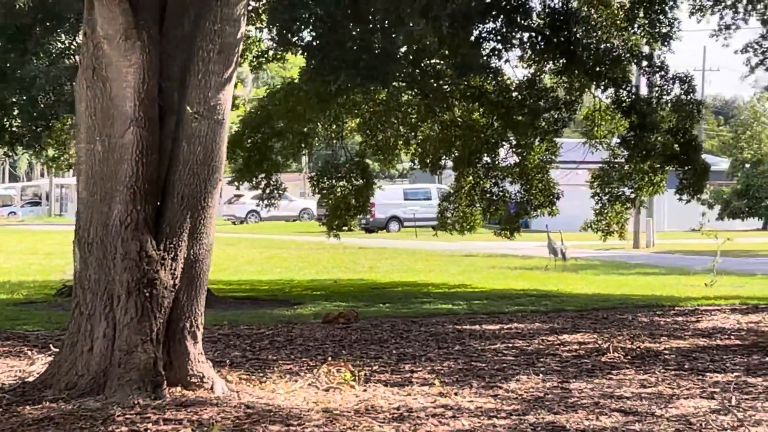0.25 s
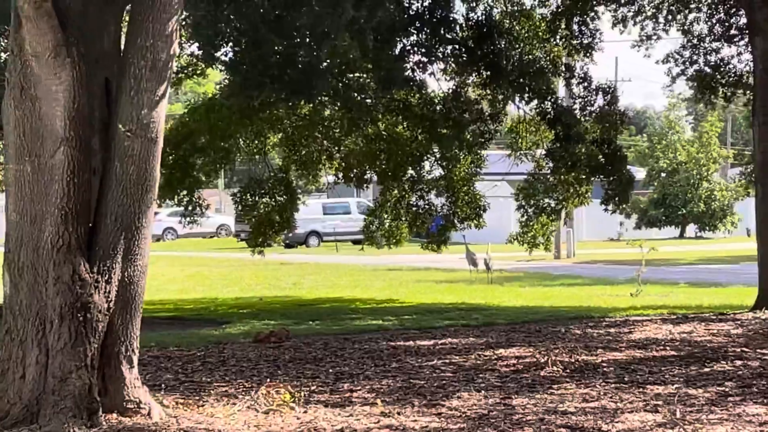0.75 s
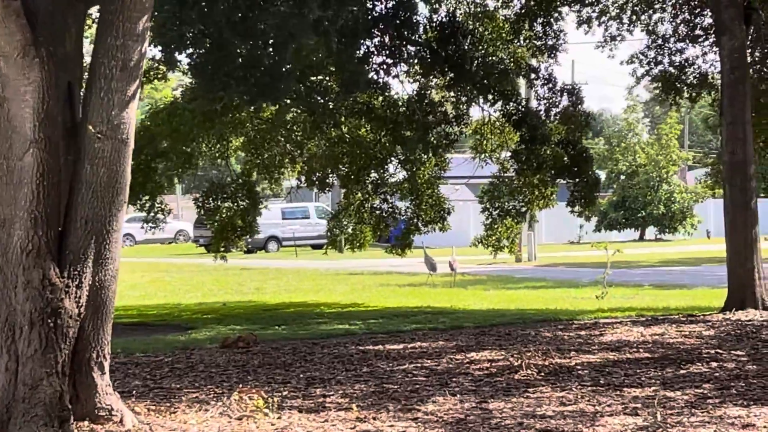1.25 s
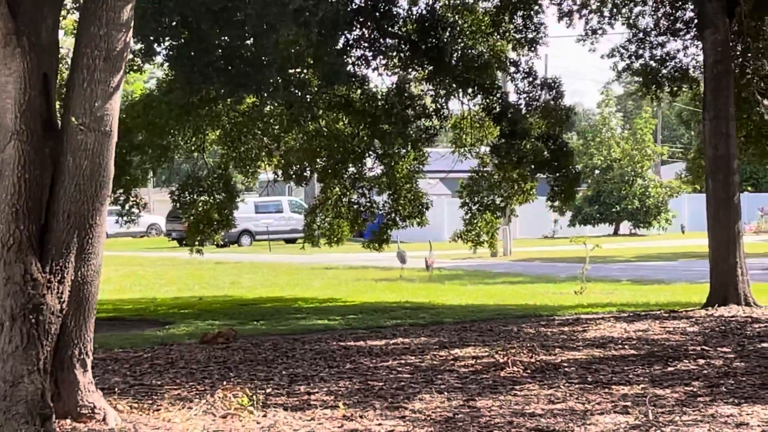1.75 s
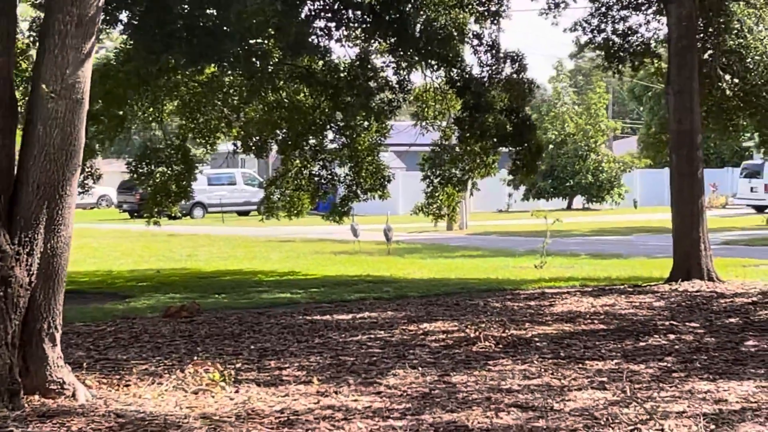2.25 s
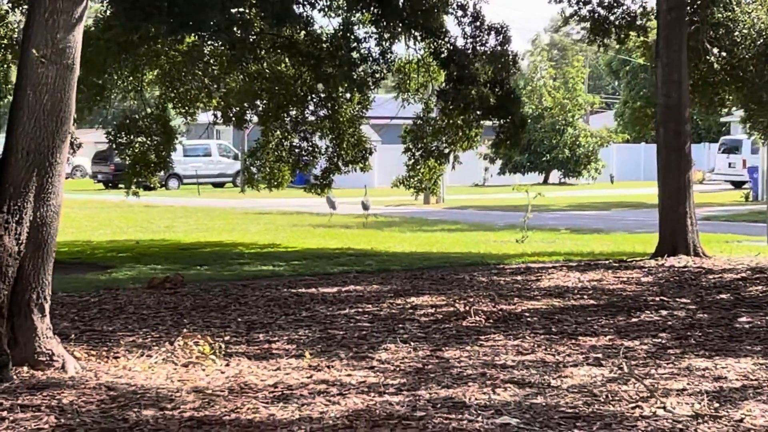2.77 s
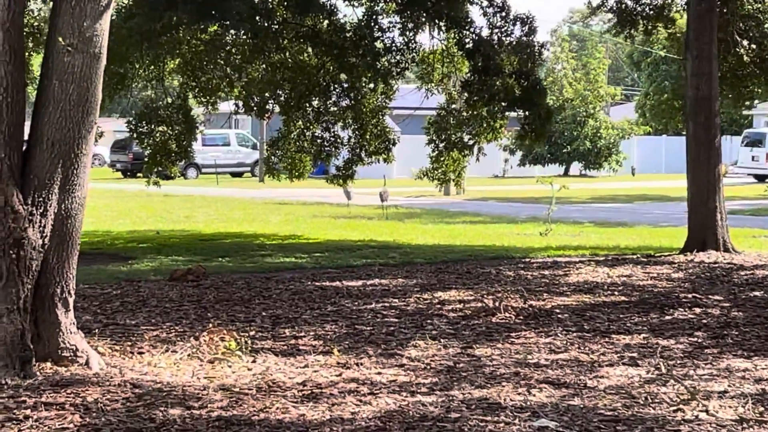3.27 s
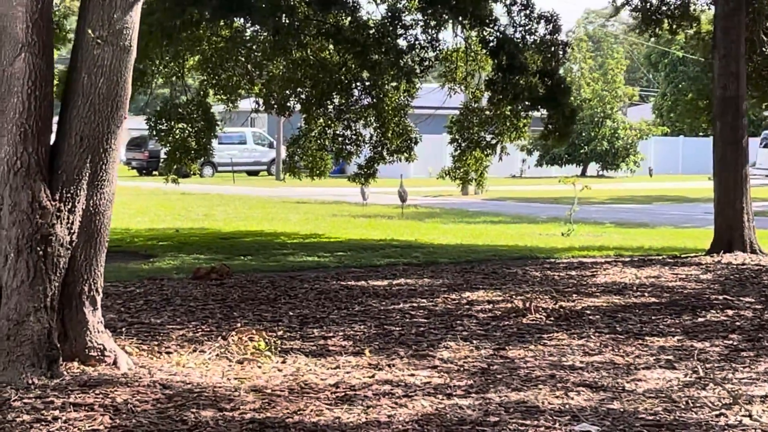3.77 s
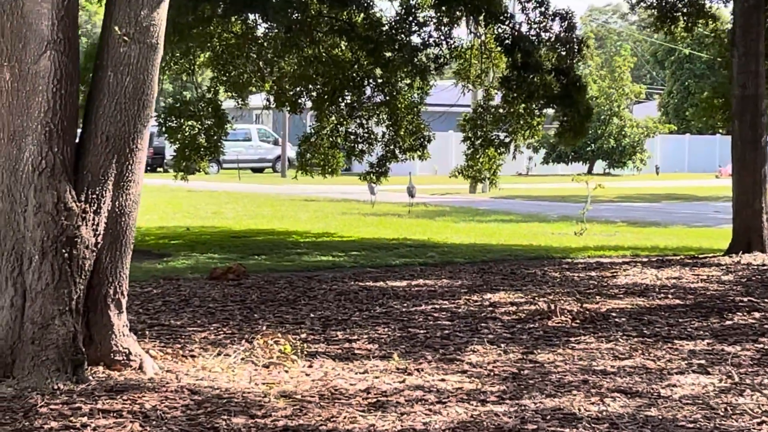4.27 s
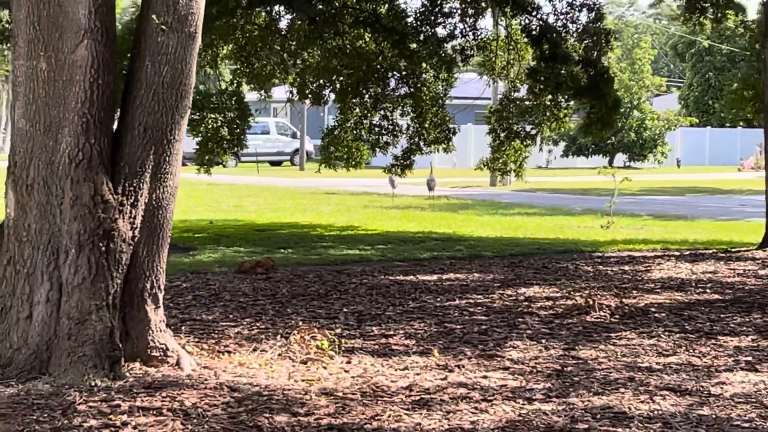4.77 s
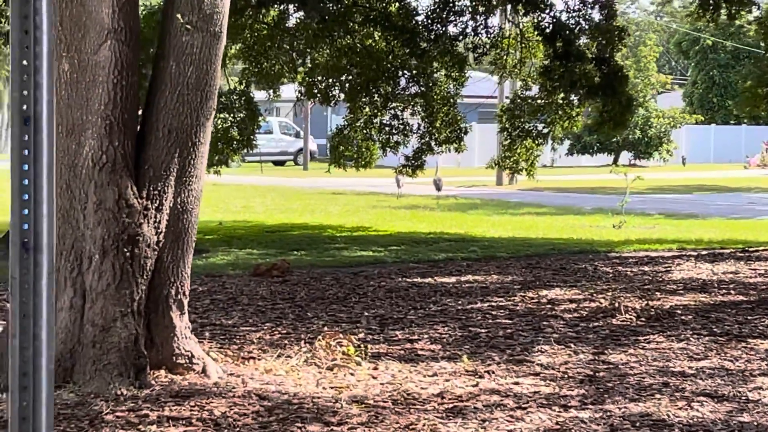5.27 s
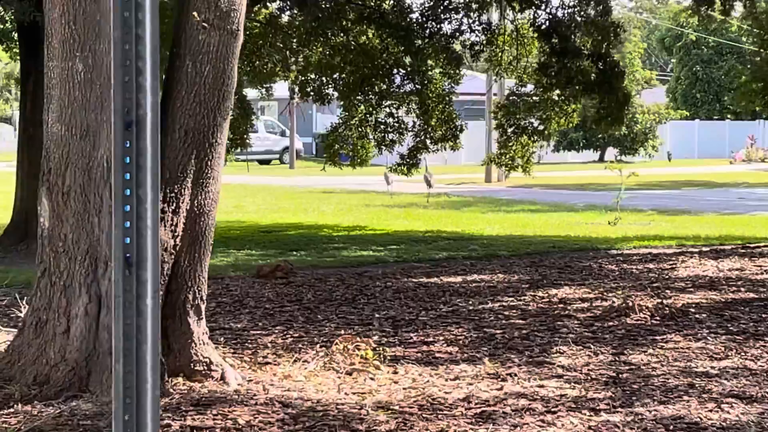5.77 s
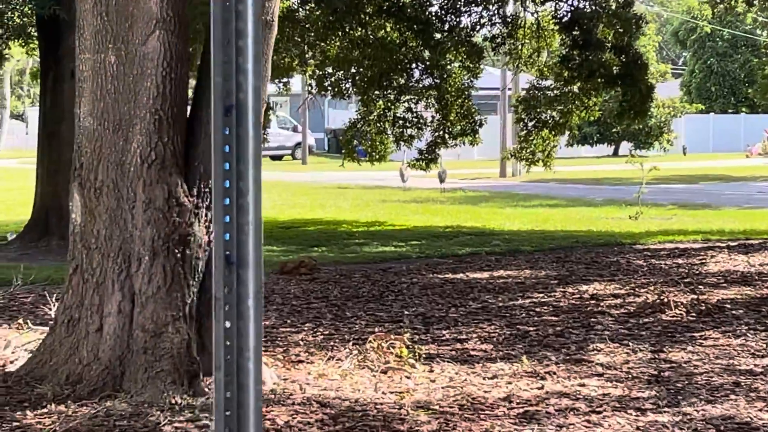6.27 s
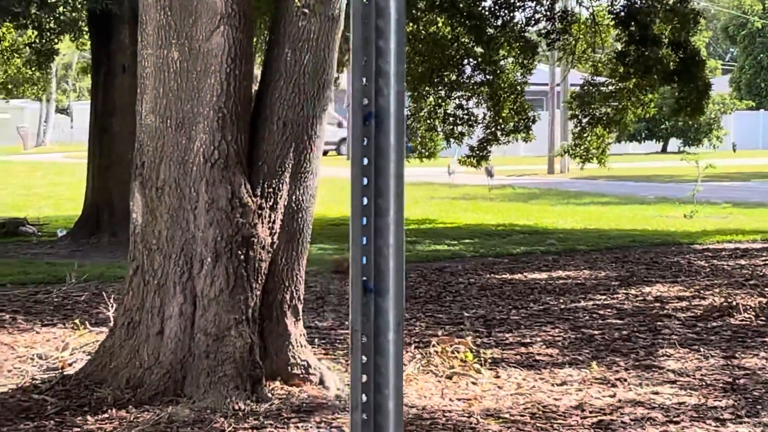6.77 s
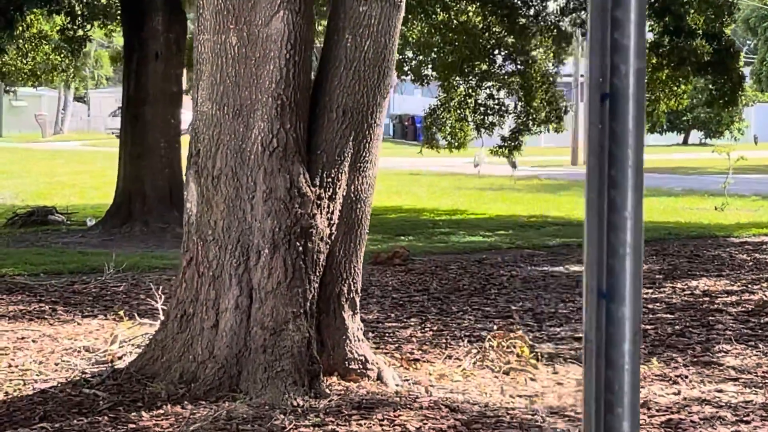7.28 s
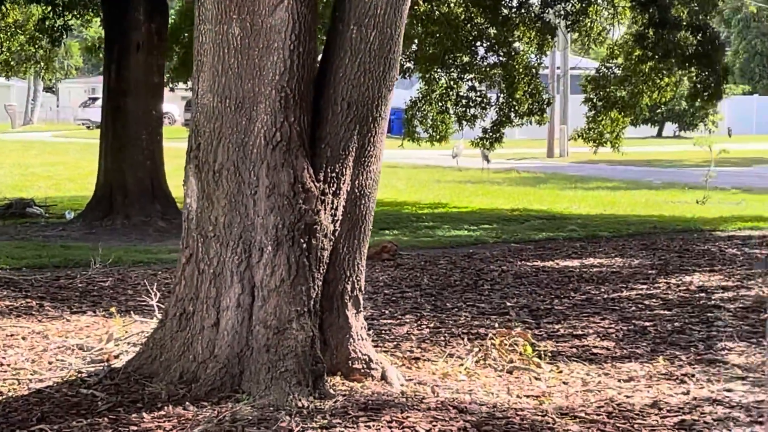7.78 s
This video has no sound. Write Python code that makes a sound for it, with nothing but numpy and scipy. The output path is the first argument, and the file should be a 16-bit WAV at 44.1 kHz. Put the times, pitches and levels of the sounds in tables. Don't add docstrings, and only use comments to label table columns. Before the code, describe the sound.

Two distant cranes give three overlapping bursts of rattling, tooting calls across a yard, echoing over low traffic rumble and faint rustling leaves.

```python
import sys
import numpy as np
from scipy import signal
from scipy.fft import rfft, irfft, next_fast_len
from scipy.io import wavfile

SR = 44100
rng = np.random.default_rng(int(sys.argv[2]) if len(sys.argv) > 2 else 0)


def output_pcm(signal):
    pcm = np.clip(np.atleast_2d(signal).T, -1, 1) * 32767
    wavfile.write(sys.argv[1], SR, np.round(pcm).astype(np.int16))


def amplitude_ratio(level_db):
    exponent = np.asarray(level_db, float) / 20
    return 10 ** exponent


N = 354034


def at_hz(points, hz):
    return np.interp(np.log(hz), np.log(np.array(points)[:, 0]), np.array(points)[:, 1])


def rms_one(x):
    return x / np.sqrt(np.mean(x ** 2) + 1e-20)


def drift(rate_hz):
    r = np.exp(-80 * np.pi * rate_hz / SR)
    slow = signal.lfilter([1], [1, -2 * r, r * r], rng.standard_normal(N // 40 + 2002))[2000:]
    return np.interp(np.arange(N) / 40, np.arange(len(slow)), rms_one(slow))


def resonate(x, hz, width_hz):
    r = np.exp(-np.pi * width_hz / SR)
    feedback = [1, -2 * r * np.cos(2 * np.pi * hz / SR), r * r]
    return signal.lfilter((1 - r * r) / 2 * np.array([1, 0, -1]), feedback, x + 1e-18)


def keep_band(x, order, edge_hz, kind):
    return signal.sosfilt(signal.butter(order, edge_hz, kind, fs=SR, output="sos"), x)


def coloured(spectrum_db, hz):
    return irfft(rfft(rng.standard_normal(2 * len(hz) - 2)) * amplitude_ratio(spectrum_db))[:N]


# f/Hz, level/dB per Hz
AIR_COLOUR = [(15, -45), (24, -30), (37, -0.5), (59, -2.5), (143, -5), (162, -11.5), (374, -21),
              (520, -21.5), (907, -26.5), (1940, -36), (4800, -46.5), (8000, -57), (10000, -46.5),
              (13000, -70)]
# f/Hz, side minus middle level/dB
AIR_WIDTH = [(30, -27), (110, -18.5), (200, -9.5), (400, -3.5), (800, 0), (1300, -2.5), (2100, -10),
             (3500, -53), (12000, -43)]
# f/Hz, width/Hz, rms level/dB
MOTOR_HUM = [
    (58.3, 21, -54),
    (137.92, 5.1, -54.5),
    (208.4, 5.1, -64),
    (298, 3.4, -72),
]


def air():
    hz = np.fft.rfftfreq(next_fast_len(N // 2 + 1) * 2, 1 / SR) + 1
    mid = coloured(at_hz(AIR_COLOUR, hz), hz)
    side = coloured(at_hz(AIR_COLOUR, hz) + at_hz(AIR_WIDTH, hz), hz)
    level = amplitude_ratio(-45 + 0.15 * drift(2.8))
    both = level * (mid + side * [[1], [-1]]) / mid.std()
    white = rng.standard_normal(N)
    for f, width_hz, db in MOTOR_HUM:
        hum = resonate(resonate(white, f, width_hz), f, width_hz)
        both = both + amplitude_ratio(db) * rms_one(hum)
    return both


# middle t/s, half length/s, level/dB
BUZZ_SWELLS = [
    (1.58, .15, -75),
    (2.788, .14, -70),
    (4.5, .15, -77),
    (6.7, 0.13, -83),
    (7.16, .09, -74),
    (7.6, .25, -83),
]


def insects():
    t = np.arange(N) / SR
    buzz = resonate(resonate(rng.standard_normal(N), 4750, 260), 4750, 260)
    swell = amplitude_ratio(-86)
    for middle_s, half_s, db in BUZZ_SWELLS:
        swell = swell + amplitude_ratio(db) * np.exp(-((t - middle_s) / half_s) ** 2)
    return swell * amplitude_ratio(-6.0 + 1.5 * drift(7.4)) * rms_one(buzz)


# start t/s, length/s, level/dB, top octave level/dB
STIRS = [(0.002, 0.0091, -73, -4), (0.303, 0.097, -76, -4), (1.274, .06, -70, 5), (1.829, 0.058, -67.5, 12),
         (1.89, 0.18, -75, 12), (2.33, 0.02, -80, -1), (2.78, 0.17, -77, 0), (3.076, 0.035, -74, 0.5),
         (3.183, .025, -85, 7), (4.455, 0.018, -82, 8), (4.677, 0.12, -75, 0), (5.373, 0.073, -77.5, 9),
         (5.434, 0.037, -69, 12), (5.734, 0.015, -82, 10), (6.967, 0.23, -78, 7), (7.194, .08, -84, 3),
         (7.4, .025, -88, 1.5), (7.596, .025, -80, 3), (7.88, .05, -76, -11)]


def stirring(calls):
    attack_s, release_s, scatter_s = 0.0075, 0.039, 0.092
    leaves_db, leaves_top_db = -76, -12
    t = np.arange(N) / SR
    keep = np.exp(-1 / (scatter_s * SR))
    scatter = amplitude_ratio(-24.5) * np.sqrt(signal.lfilter([1 - keep], [1, -keep], calls ** 2 + 1e-18))
    body = amplitude_ratio(leaves_db) + scatter
    top = amplitude_ratio(leaves_db + leaves_top_db) + amplitude_ratio(-48) * scatter
    for s, length_s, db, top_db in STIRS:
        rise = np.clip((t - s) / attack_s + 1, 0, 1)
        shape = rise * np.exp(-np.maximum(t - s - length_s, 0) / release_s)
        body = body + amplitude_ratio(db) * shape
        top = top + amplitude_ratio(db + top_db) * shape
    return body, top


# t/s, peak level/dB, level of the part under 3.8 kHz/dB
TICK_EVENTS = [(0.4349, -53, 1), (0.4995, -46, 2), (1.918, -47, -7), (1.9706, -45, -1), (1.9952, -49, 8.5),
               (2.0234, -52, 9), (2.0732, -44, -1), (2.35, -50, -1), (3.0837, -55, 6), (3.4999, -58, -1),
               (4.4637, -48, -1), (4.6074, -66, 5), (4.6704, -49, 3), (4.758, -42, -3), (5.37, -41, -17),
               (5.4314, -47, 6), (5.456, -40, 6), (5.6394, -50.5, -4), (5.6864, -49, 5.5),
               (7.109, -27.5, -2.5), (7.1105, -30, -2.5), (7.2026, -38.5, -16), (7.2694, -49, -7),
               (7.6194, -55, -3), (7.8853, -52, 4)]


def ticks():
    out, t = np.zeros(N), np.arange(900) / SR
    for s, db, knock_db in TICK_EVENTS:
        crackle = rng.standard_normal(900) * (0.65 * np.exp(-t / 0.00055) + 0.12 * np.exp(-t / 0.0095))
        snap = 3.5 * (t == 0) + crackle
        bright = keep_band(snap, 1, [4000, 9000], "band")
        knock = amplitude_ratio(knock_db + 9.0) * keep_band(snap, 1, [500, 3800], "band")
        out[round(s * SR):][:900] += amplitude_ratio(db - 4) * (bright + knock)
    return out


# f/Hz, level/dB per Hz
GRAIN_COLOUR = [(900, -56), (2500, 1), (5000, 3), (8000, -2.5), (11500, -5), (15000, -8)]


def rustle(calls, grains_per_s, grain_db):
    hz = np.fft.rfftfreq(512, 1 / SR) + 1
    colour = signal.minimum_phase(np.roll(irfft(amplitude_ratio(2 * at_hz(GRAIN_COLOUR, hz))), 256)[1:])
    sizes = amplitude_ratio(grain_db * np.minimum(rng.exponential(1, N), 4)) * rng.choice([-1, 1], N)
    struck = rng.random(N) < grains_per_s / SR
    grains = rms_one(signal.lfilter(colour, 1, sizes * struck))
    body_gain, top_gain = stirring(calls)
    body = keep_band(grains, 4, 10300, "low")
    top = keep_band(grains, 4, 10300, "high")
    restless_top = top_gain * amplitude_ratio(8.0 + 3.4 * drift(9.2)) * top
    mid = amplitude_ratio(0.5 + 1.57 * drift(32)) * (body_gain * body + restless_top)
    apart = np.roll(grains, N // 2) - np.roll(body, N // 2) * (1 - amplitude_ratio(-6))
    side = amplitude_ratio(-16.5) * amplitude_ratio(3.8 * drift(9)) * top_gain * apart
    return mid + ticks() + side * [[1], [-1]]


# delay t/s, left level/dB, right level/dB
YARD_ECHOES = [
    (.0052, -12, -33),
    (.0175, -10.5, -13),
    (.038, -19, -28),
    (.0715, -31, -11.5),
    (.104, -56, -22),
]
# f/Hz, time to fall 60 dB/s, level/dB
TAIL_BANDS = [(850, 0.94, 0), (1720, 0.99, -6), (4550, 1, 2), (8750, 0.9, 10.5)]


def yard(x, tail_db, wide_db):
    dull = signal.lfilter([.45], [1, -.55], x)
    out = np.array([x, x])
    for delay_s, *sides_db in YARD_ECHOES:
        lag = round(delay_s * SR)
        out[:, lag:] += amplitude_ratio(np.array(sides_db))[:, None] * dull[:-lag]
    t, tail = np.arange(SR) / SR, 0
    for hz, t60, db in TAIL_BANDS:
        hiss = keep_band(rng.standard_normal((2, SR)), 2, [hz / 1.49, hz * 1.26], "band")
        tail = tail + hiss * amplitude_ratio(db - 60 * t / t60) * (1 - np.exp(-t / 0.056))
    stirred = np.tanh(4 * drift(150))
    mid, side = signal.fftconvolve(x[None] * stirred, amplitude_ratio(tail_db) * tail, axes=1)[:, :N]
    side = keep_band(side, 3, 2500, "low")
    return out + mid + amplitude_ratio(wide_db) * side * [[1], [-1]]


# start t/s, length/s, top of third overtone f/Hz, peak level/dB,
# lower overtones level/dB
TOOT_EVENTS = [
    (0.475, 0.048, 1690, -53.5, 2),
    (0.666, 0.075, 1742, -42, -0.5),
    (3.47, .017, 1800, -63, 8),
    (3.628, 0.062, 1716, -42, 1),
    (5.71, 0.039, 1782, -55, 8),
    (5.885, 0.07, 1743, -41, -2.5),
]
OVERTONES = [-12, 0.5, 1.5, -13.5, -7.5, -8.5, -20, -20, -29]


def toots():
    glide, glide_share = .13, .28
    swell_db, swell_share = 12.5, 0.43
    release_s, release_db = 0.006, 14
    low_at_edges_db, waver_db = 11, 2.5
    out, flutter = np.zeros(N), drift(80)
    for s, length_s, top_hz, peak_db, lower_db in TOOT_EVENTS:
        span = np.arange(round(s * SR), round((s + length_s) * SR))
        gone = (span / SR - s) / length_s
        left_s = (span[-1] - span) / SR
        third_hz = top_hz * (1 - glide * np.exp(-gone / glide_share))
        early = np.clip(1 - gone / swell_share, 0, 1)
        closing = np.clip(1 - left_s / release_s, 0, 1)
        db = peak_db - swell_db * early - release_db * closing
        low_db = lower_db + low_at_edges_db * np.maximum(early, closing)
        phase = 2 * np.pi * np.cumsum(third_hz * (1 + flutter[span] / 150) / 3) / SR
        edge = np.clip(np.minimum(span - span[0], span[-1] - span) / (.005 * SR), 0, 1)
        for k, overtone_db in enumerate(OVERTONES, 1):
            effort_db = .5 * (db + 41.5) * (k > 3)
            waver = waver_db * flutter[span - 3000 * k]
            gain = amplitude_ratio(db + low_db * (k < 3) + effort_db + overtone_db + 3.5 + waver)
            out[span] += edge * gain * np.sin(k * phase + k * k)
    return out


def rattle(beats, pipe, rough, bright_db, kept, rise_ms, low_decay_db, upper_decay_db, fall, breath_db):
    upper, lowest, flow = np.zeros(N + 1), np.zeros(N + 1), np.zeros(N)
    cycle = np.arange(40)
    for s, db, hz, length_ms in beats:
        timing, size = rng.standard_normal((2, 40))
        upper_db = bright_db - kept * (db + 30)
        late = np.clip(cycle / hz * 1000 / length_ms, 0, 1)
        uneven = rough * (.2 + late ** 2)
        dropped = np.clip((late - .55) / .2, 0, 1)
        period_ms = 990 / hz * (1 + .03 * late + fall * dropped) * np.exp(.16 * uneven * timing)
        t_ms = np.cumsum(period_ms) - period_ms[0] - 1.6
        burst_db = 3.5 * np.exp(-((t_ms - 3.37) / 2.1) ** 2)
        rise = np.clip((t_ms + 1.66) / rise_ms, 0, 1)
        stop = np.clip((length_ms - t_ms) / 0.39, 0, 1)
        shape = amplitude_ratio(db + burst_db) * rise * stop
        strength = shape * amplitude_ratio(5 * uneven * size) * (1 - .7 * uneven * (cycle % 2))
        place = (s + t_ms / 1000) * SR
        whole, part = place.astype(int), place % 1
        snap_db = 4 * np.exp(-cycle / 2.0)
        upper_gain = amplitude_ratio(upper_db + upper_decay_db * late + snap_db)
        for train, gain in ((upper, upper_gain), (lowest, amplitude_ratio(low_decay_db * late))):
            np.add.at(train, whole, gain * strength * (1 - part))
            np.add.at(train, whole + 1, gain * strength * part)
        span = np.arange(whole[0], whole[-1])
        flow[span] += np.interp(span, place, shape * amplitude_ratio(upper_db + upper_decay_db * late))
    breath = amplitude_ratio(breath_db) * flow * rng.standard_normal(N)
    out = np.zeros(N)
    for k, (hz, width_hz, db) in enumerate(pipe):
        driven = lowest[:N] if k == 0 else upper[:N] + breath * hz / 4000
        out += (-1) ** k * amplitude_ratio(db) * resonate(driven, hz, width_hz)
    return keep_band(out, 4, 600, "high")


# t/s, peak level/dB, f/Hz, length/ms
LOW_BIRD_BEATS = [(0.796, -26, 767, 22), (0.87, -28.5, 771, 22.3), (0.933, -27, 769, 22.5),
                  (0.99, -27.5, 767, 22.3), (1.047, -28, 752, 21), (3.757, -27, 763, 22.4),
                  (3.831, -32, 757, 22), (3.89, -27, 766, 22.3), (3.947, -28, 777, 21.4),
                  (4.002, -29.5, 745, 21.7), (6.015, -37, 783, 22), (6.087, -41, 756, 22),
                  (6.15, -33, 733, 22.9), (6.209, -37, 759, 22), (6.264, -38.5, 754, 22)]
# f/Hz, width/Hz, level/dB
LOW_BIRD_PIPE = [(813, 138, 6.5), (1230, 310, 2.5), (1584, 246, 3.5), (1904, 200, 1.5), (2250, 370, -11),
                 (2840, 380, -6), (3650, 1800, -19), (5560, 2000, -31), (11100, 1400, -41)]
# t/s, peak level/dB, f/Hz, length/ms
CROAK_BEATS = [(1.101, -27.5, 602, 14), (1.155, -28.5, 611.5, 18), (1.204, -31, 607, 13),
               (1.3, -53, 640, 25), (4.058, -27.5, 599, 18), (4.114, -27.5, 602, 13.4),
               (4.163, -30.5, 597, 11.2), (4.217, -71, 580, 6.5), (6.32, -28, 596, 16),
               (6.373, -28.5, 601, 15.2), (6.428, -30.5, 595, 12.4), (6.48, -43.5, 607, 14)]
# f/Hz, width/Hz, level/dB
CROAKING_PIPE = [(777, 84, 8.5), (1000, 140, 6.5), (1276, 116, 2.5), (1700, 296, 3.5), (2240, 300, -19.5),
                 (2690, 410, -11.5), (3370, 760, -11.5), (4070, 520, -16.5), (6200, 2600, -44),
                 (11100, 1200, -48)]


def low_crane():
    beats = rattle(LOW_BIRD_BEATS, LOW_BIRD_PIPE, rough=0.61, bright_db=-2.4, kept=1, rise_ms=0.53,
                   low_decay_db=-11.5, upper_decay_db=-6.0, fall=0.186, breath_db=-13)
    croaks = rattle(CROAK_BEATS, CROAKING_PIPE, rough=0.7, bright_db=-5.5, kept=0.41, rise_ms=2.1,
                    low_decay_db=-5.5, upper_decay_db=-0.5, fall=0.043, breath_db=-17.5)
    return amplitude_ratio(28) * beats + amplitude_ratio(28.5) * croaks + toots()


# t/s, peak level/dB, f/Hz, length/ms
HIGH_BIRD_BEATS = [(0.618, -29.5, 933, 16.8), (0.687, -29, 959, 22), (0.747, -30, 954, 23.4),
                   (0.801, -31.5, 940, 30), (0.859, -30.5, 886, 30), (0.914, -31, 918, 15),
                   (0.966, -36.5, 950, 18.5), (1.019, -39, 920, 16.5), (3.586, -28, 896, 13.8),
                   (3.656, -27, 968, 12.5), (3.716, -27, 932, 15.4), (3.774, -24.5, 928, 15.4),
                   (3.83, -22, 879, 16.7), (3.888, -25, 903, 15.6), (3.945, -28.5, 928, 17),
                   (3.997, -30.5, 904, 14), (4.046, -38, 970, 24), (5.841, -29, 955, 20.5),
                   (5.909, -26.5, 951, 19.7), (5.971, -27.5, 964, 17), (6.027, -27.5, 932, 22),
                   (6.084, -27, 864, 19.7), (6.14, -29.5, 938, 28), (6.196, -30.5, 934, 18.5),
                   (6.245, -36.5, 948, 12.6), (6.3, -41.5, 920, 13)]
# f/Hz, width/Hz, level/dB
HIGH_BIRD_PIPE = [(840, 370, 4.5), (1546, 500, -1), (1968, 180, -2.5), (2310, 336, -7.5),
                  (3170, 190, -11.5), (3880, 760, -20), (5600, 5400, -32), (10600, 11000, -39.5)]


def high_crane():
    return amplitude_ratio(27) * rattle(HIGH_BIRD_BEATS, HIGH_BIRD_PIPE, rough=0.53, bright_db=0.41, kept=0.21, rise_ms=1.3,
                            low_decay_db=-7.5, upper_decay_db=-5.5, fall=0.087, breath_db=-19.5)


def scene():
    high, low = high_crane(), low_crane()
    calls = high + low
    cranes = yard(calls, tail_db=-41.5, wide_db=-9)
    lean = resonate(amplitude_ratio(-10.5) * high + amplitude_ratio(-6.5) * low, 960, 310)
    near = rustle(calls, grains_per_s=6500, grain_db=2.5)
    return cranes + lean * [[-1], [1]] + air() + insects() + near


# f/Hz, lead/radians
PORT_LEAD = [(100, 0), (450, .4), (1000, -.25), (1700, 0), (3100, -.6), (5600, -.7), (6300, 0), (7450, 0),
             (8000, -.8), (8400, 0), (8900, 0), (10150, 3.14), (10750, 3.14), (11700, 6.28)]


def swinging_ports(dry):
    size = next_fast_len(N + 4096)
    hz, spectrum = np.fft.rfftfreq(size, 1 / SR) + 1, rfft(dry, size)

    def turned(shift):
        lead = at_hz(PORT_LEAD, hz / np.where(hz > 9000, shift, 1))
        return irfft(spectrum * np.exp(lead / 2 * [[1j], [-1j]]), size)[:, :N]

    before, after = turned(.99), turned(1.035)
    swung = np.clip((np.arange(N) / SR - 5.6) / 2.3, 0, 1)
    swung = np.clip(swung + 0.12 * drift(2.4), 0, 1)
    return before + swung * (after - before)


def top_cut(x):
    return signal.sosfilt(signal.butter(12, 12930, fs=SR, output="sos"), x)


def record(dry):
    ports = keep_band(swinging_ports(dry), 4, 34, "high")
    mix = signal.sosfilt(signal.cheby2(10, 50, 13300, fs=SR, output="sos"), ports)
    return top_cut(mix)


dry = scene()
out = record(dry)
output_pcm(out)
```